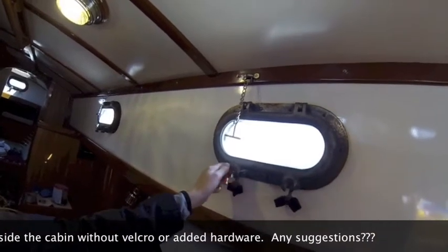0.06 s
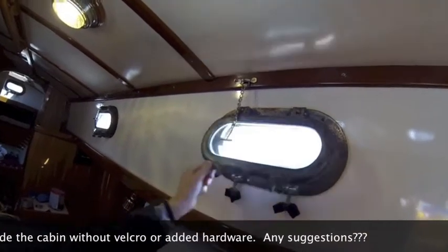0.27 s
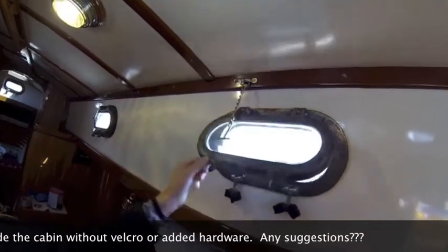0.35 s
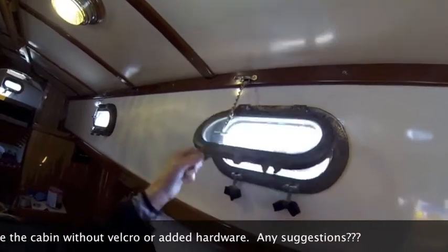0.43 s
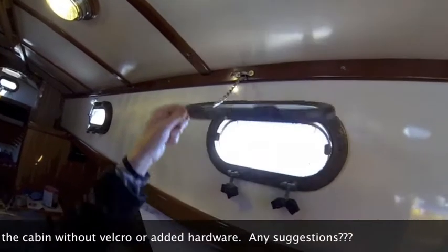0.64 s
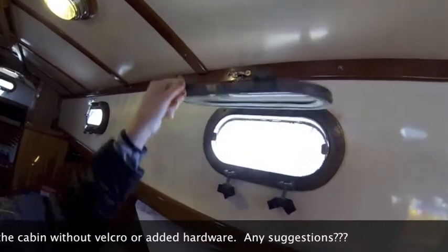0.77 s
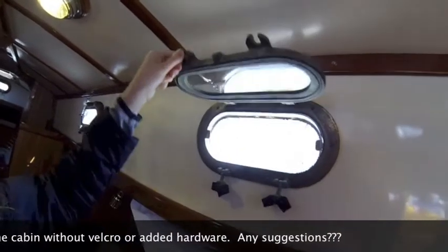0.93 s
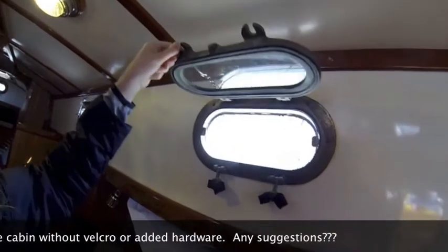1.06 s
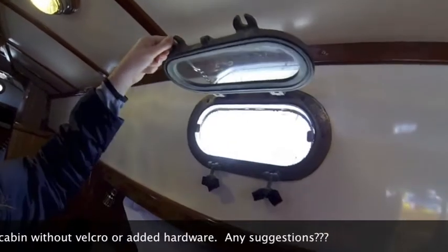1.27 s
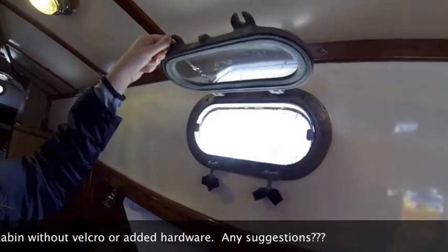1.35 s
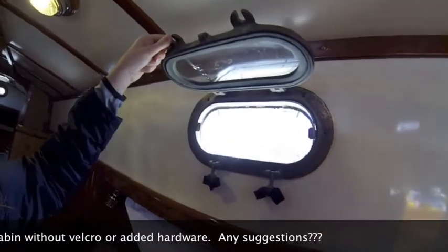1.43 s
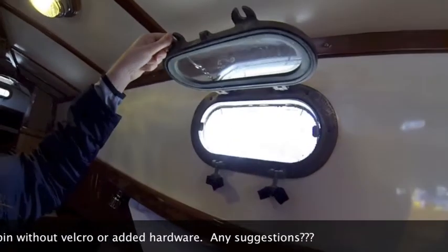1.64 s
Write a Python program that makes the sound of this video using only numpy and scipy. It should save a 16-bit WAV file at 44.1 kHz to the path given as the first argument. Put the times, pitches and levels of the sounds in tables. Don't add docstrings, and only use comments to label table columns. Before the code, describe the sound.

A metal porthole is pulled open by hand: sharp snaps and a heavy thud as the seal lets go, then lighter hinge and fastener rattles, close to the microphone in a small, briefly echoing boat cabin.

```python
import sys
import numpy as np
from scipy import signal
from scipy.io import wavfile
from scipy.ndimage import uniform_filter1d

SR = 44100
rng = np.random.default_rng(int(sys.argv[2]) if len(sys.argv) > 2 else 0)


def store_wav(level_fs):
    pcm = np.round(np.clip(np.atleast_2d(level_fs), -1, 1) * 32767)
    wavfile.write(sys.argv[1], SR, pcm.T.astype(np.int16))


def attenuation_scalar(level_db):
    decades = np.asarray(level_db, float) / 20
    return 10 ** decades


N = 74970

# pitch in Hz, level in dB, time to die by 60 dB in seconds.
FRAME_MODES = [(650, -2, .05), (335, -8, .1), (168, -4, .06), (1400, -7, .012)]


def rms_one(x):
    return x / np.sqrt(np.mean(x ** 2) + 1e-20)


def drift(rate_hz):
    r = np.exp(-2 * np.pi * rate_hz * 40 / SR)
    noise = rng.standard_normal(N // 40 + 2002)
    slow = signal.lfilter([1], [1, -2 * r, r * r], noise)[2000:]
    return np.interp(np.arange(N) / 40, np.arange(len(slow)), rms_one(slow))


def band(x, low_hz, high_hz):
    return signal.sosfilt(signal.butter(2, [low_hz, high_hz], "band", fs=SR, output="sos"), x)


def ring(clicks, hz, t60):
    r = 1000 ** (-1 / (t60 * SR))
    w = 2 * np.pi * hz / SR
    return signal.lfilter([0, np.sin(w)], [1, -2 * r * np.cos(w), r * r], clicks + 1e-18)


def strike(s, db, modes):
    rebound_s, rebound_db, spread_db = .0006, -8, 2.0
    out = np.zeros(N)
    luck = rng.standard_normal((len(s), 2 * len(modes)))
    for k, (hz, mode_db, t60) in enumerate(modes):
        clicks = np.zeros(N)
        for j in range(2):
            at = ((s + j * rebound_s) * SR).astype(int)
            strength_db = db + mode_db + j * rebound_db + spread_db * luck[:, 2 * k + j]
            np.add.at(clicks, at, attenuation_scalar(strength_db))
        out += ring(clicks, hz, t60)
    return out


def floor():
    # pitch in Hz, level in dB per Hz.
    rumble_hiss = [(12, -28), (20, 0.5), (80, -7.5), (121, -5.5), (337, -17), (398, -18), (1880, -28),
                   (13100, -45), (15000, -38)]
    edges = 18 * 2 ** np.arange(0, 10.1, .5)
    white = rng.standard_normal((2, N + SR // 2))
    hz, db = np.transpose(rumble_hiss)
    out = 0
    for k, (low, high) in enumerate(zip(edges, np.minimum(edges[1:], .45 * SR))):
        level_db = np.interp(np.log(low * high) / 2, np.log(hz), db) + 1.0 * drift(5.8)
        out = out + attenuation_scalar(level_db) * band(white[k % 2], low, high)[-N:]
    return attenuation_scalar(-52.5) * rms_one(out)


def whine():
    # pitch in Hz, level in dB.
    pulsed_tones = [(12880, -65), (6445, -70)]
    # pitch in Hz, level in dB.
    steady_tones = [(8772, -82), (7312, -90)]
    pulses_per_s, first_s, on_s = 48.0, .0197, .0075
    t = np.arange(N) / SR
    cycle, since = np.divmod(t - first_s + 1 / pulses_per_s, 1 / pulses_per_s)
    gate = uniform_filter1d(1. * (since < on_s), size=30)
    phase = rng.normal(0, 0.84, 200)[cycle.astype(int)]

    def tones(rows, t, phase):
        return sum(attenuation_scalar(db) * np.sin(2 * np.pi * hz * t + phase) for hz, db in rows)

    return gate * tones(pulsed_tones, since, phase) + tones(steady_tones, t, 0)


def hand():
    # time in seconds, level in dB.
    grip = [
        (0.0, -53),
        (0.104, -55),
        (0.358, -48.5),
        (0.44, -49.5),
        (0.904, -55.5),
        (1.088, -66),
        (1.198, -66),
        (1.548, -72),
        (1.7, -101),
    ]
    slips_per_s, rub_db = 900, -1
    s, db = np.transpose(grip)
    slips = (rng.random(N) < slips_per_s / SR) * rng.standard_normal(N)
    hum = 0
    for hz, mode_db, t60 in FRAME_MODES:
        hum = hum + attenuation_scalar(mode_db) * rms_one(band(ring(slips, hz, t60), hz / 2, hz * 2))
    return attenuation_scalar(np.interp(np.arange(N) / SR, s, db) + rub_db) * hum


def squeak():
    # start in seconds, length in seconds, pitch in Hz, level in dB.
    hinge_tone = (1.425, .06, 1610, -63)
    start, length, hz, db = hinge_tone
    t = np.arange(N) / SR
    swell = np.sin(np.pi * np.clip((t - start) / length, 0, 1))
    return attenuation_scalar(db + 2 * drift(40)) * swell * np.sin(2 * np.pi * hz * t)


def thuds():
    # start in seconds, level in dB, lower mode in dB, upper mode in dB (both added to the level).
    blows = [(0.064, -41, -12, 3.5), (0.105, -34, -26, 4.5), (0.205, -40, -2, -20),
             (0.271, -26.5, -5.5, -18), (0.321, -39.5, 9, -8), (0.374, -45, 15, -12), (0.413, -37, -8, -12),
             (0.467, -20.5, -6.5, -15), (0.477, -18, -7.5, 2), (0.578, -45.5, 2.5, -7),
             (0.624, -39, -11, 2), (0.733, -33, -11, 4), (0.796, -35.5, -10, 0), (0.866, -38, -12, -12),
             (0.921, -46.5, -8, -15), (1.004, -37.5, -14, -4), (1.02, -36, -10.5, 1), (1.039, -41, -20, -5),
             (1.057, -41.5, -16, -14), (1.164, -38.5, -12, 8), (1.192, -39, -9, -1), (1.407, -44, -15, -14),
             (1.434, -46, -9, -18), (1.549, -43.5, -12, -22)]
    # pitch in Hz, level in dB, time to die by 60 dB in seconds.
    upper_mode = (1085, -5, 0.012)
    soft_hz = 540
    s, db, low_db, high_db = np.transpose(blows)
    modes = [FRAME_MODES[0], FRAME_MODES[1], upper_mode]
    out = 0
    for mode, part_db in zip(modes, [db, db + low_db, db + high_db]):
        hz = mode[0]
        swell = ring(strike(s, part_db, [mode]), hz, 7 / soft_hz) * 2 * soft_hz / SR
        out = out + band(swell, hz * .7, hz * 1.4) * attenuation_scalar(2.5 * drift(50))
    return out


def hits():
    # start in seconds, peak in dB, then body, brightness and fastener ring
    # in dB added to the peak.
    seal_snaps = [(0.0986, -63.5, 11.5, -2, -5), (0.2039, -10, -3.5, -6.5, -28.5),
                  (0.2681, -8, -9, -8, -11), (0.3184, -15.5, -5.5, -7.5, -9.5), (0.3714, -18, -8, -13, -23),
                  (0.4038, -17.5, -8.5, -12.5, -17), (0.4092, -18, -16.5, -6, -18),
                  (0.4131, -29, -5, -32, -42), (0.4239, -27.5, -21, -9.5, -22),
                  (0.4291, -33, 1.5, -2.5, -31), (0.4626, -18.5, -1, -31, -32),
                  (0.4965, -32.5, -8.5, -9, -29), (0.5114, -39.5, -6.5, -11, -27),
                  (0.578, -46.5, -6, -17, -25), (0.614, -58.5, 10, -17, -16)]
    # start in seconds, peak in dB, then body, brightness and
    # fastener ring in dB added to the peak.
    loose_rattles = [(0.732, -48, 0.5, -8, -23), (0.7872, -25, -10.5, -8.5, -22),
                     (0.7942, -25.5, -1.5, -16.5, -19), (0.7977, -35, -4.5, -28, -23),
                     (0.8049, -27.5, 2, -16, -39), (0.8084, -39.5, -1, -12, -22),
                     (0.8157, -37, 4, -1.5, -13), (0.8391, -33, -17, -10.5, -14),
                     (0.8454, -39, -18, -10, -27), (0.8791, -30.5, -26, -9, -21),
                     (0.8856, -32, -24, -15, -30), (1.0003, -39, -13.5, -7.5, -19),
                     (1.011, -39.5, -14, -9, -29), (1.1643, -57, 8.5, -12, -13),
                     (1.2285, -33, -1.5, -25, -42)]
    s, db, body_db, bright_db, ring_db = np.transpose(list(seal_snaps) + list(loose_rattles))
    lag_s = .0007
    return s + lag_s, db + body_db + 8, db + 6, db + bright_db + 16, db + ring_db + 22


def cabin():
    # low limit in Hz, high limit in Hz, crack in dB, cabin in dB, echo time to die by 60 dB in seconds.
    echo_bands = [(463, 960, -19.5, -39.5, 0.66), (1050, 2200, -12.5, -30, 0.31),
                  (2090, 3740, -32.5, -31.5, 0.2), (4200, 6530, -17.5, -36, 0.21),
                  (7410, 10000, -37.5, -39.5, 0.16), (10400, 27000, -32, -49, .13)]
    crack_t60_s, rise_s = 0.017, 0.012
    s, body_db, mid_db, bright_db, _ = hits()
    per_t60 = 6 * np.log(10)

    def fade(power, seconds):
        return signal.lfilter([1], [1, -np.exp(-1 / (seconds * SR))], power + 1e-18)

    out = 0
    for k, (low, high, crack_db, cabin_db, t60) in enumerate(echo_bands):
        hit_db = (body_db, body_db, mid_db, bright_db)[min(k, 3)]
        power = np.zeros(N)
        np.add.at(power, (s * SR).astype(int), attenuation_scalar(2 * hit_db))
        crack = fade(power, crack_t60_s / per_t60)
        late = np.maximum(fade(power, t60 / per_t60) - fade(power, rise_s / 2), 0)
        level = attenuation_scalar(2 * crack_db) * crack + attenuation_scalar(2 * cabin_db) * late
        noise = band(rng.standard_normal(N), low, min(high, .4 * SR))
        noise = band(noise, .8 * low, min(1.2 * high, .45 * SR))
        out = out + np.sqrt(np.abs(level)) * rms_one(noise)
    return out


def knocks():
    # pitch in Hz, level in dB, time to die by 60 dB in seconds.
    body_modes = [(1440, -4, .026), (1120, -21, .008), (1800, -17, .008)]
    mid_modes = [(2290, -22, 0.015), (2652, -9, 0.014), (3143, -7.5, 0.0051), (3660, -23, 0.011)]
    edge_modes = [(5120, -19, 0.0094), (5464, -17.5, 0.0099), (7060, -15, 0.0046), (7640, -31, 0.0086),
                  (9070, -20, .006)]
    fastener_modes = [(10365, -30, .06), (11470, -42, .06), (12130, -42, .06), (13915, -32, .15),
                      (13860, -36, .08)]
    s, body_db, mid_db, bright_db, ring_db = hits()
    held = s >= 1.1
    free = ~held
    damped = [(hz, db - 0.5, t60 * .3) for hz, db, t60 in body_modes]
    dull = strike(s[free], body_db[free], body_modes) + strike(s[held], body_db[held], damped)
    dull = dull + strike(s, mid_db, mid_modes)
    dull = signal.sosfilt(signal.butter(2, 4420, fs=SR, output="sos"), dull)
    near = dull + strike(s, bright_db, edge_modes)
    near = signal.sosfilt(signal.butter(4, 880, "high", fs=SR, output="sos"), near)
    return near + strike(s, ring_db, fastener_modes) * attenuation_scalar(3.0 * drift(90))


def scene():
    background = floor() + whine()
    handling = hand() + squeak() + thuds()
    return (background + handling + cabin() + knocks())[None]


def roll_off(x):
    return signal.sosfilt(signal.butter(12, 16550, fs=SR, output="sos"), x)


def record(dry):
    mix = signal.sosfilt(signal.butter(12, 14200, fs=SR, output="sos"), dry)
    return roll_off(mix)


dry = scene()
out = record(dry)
store_wav(out)
```